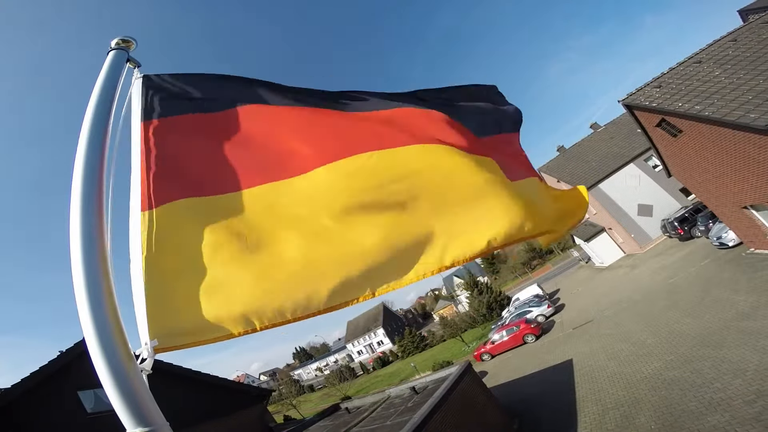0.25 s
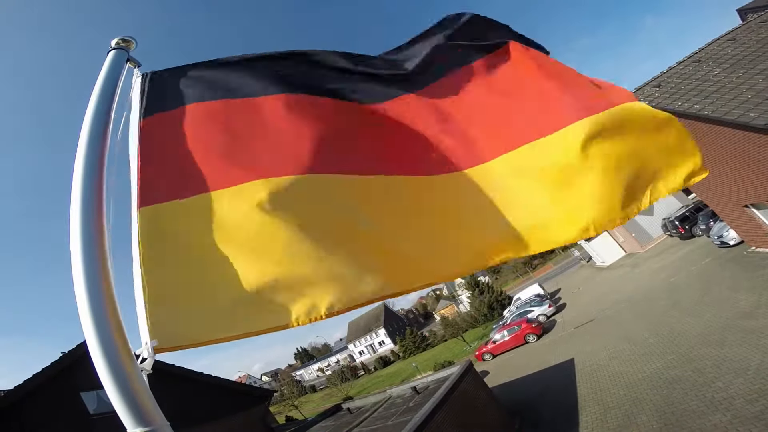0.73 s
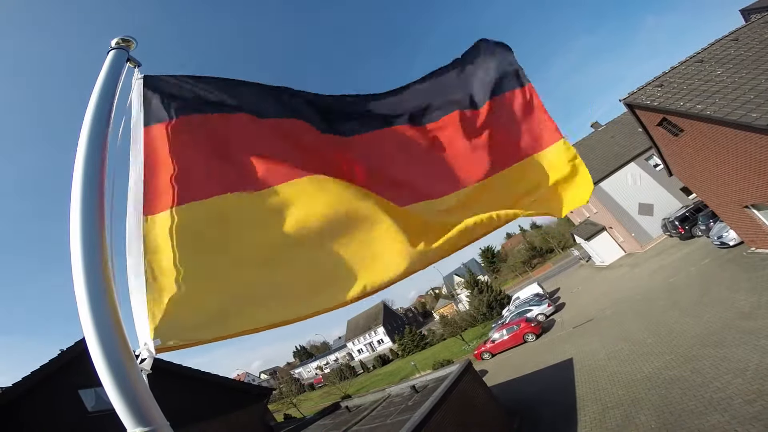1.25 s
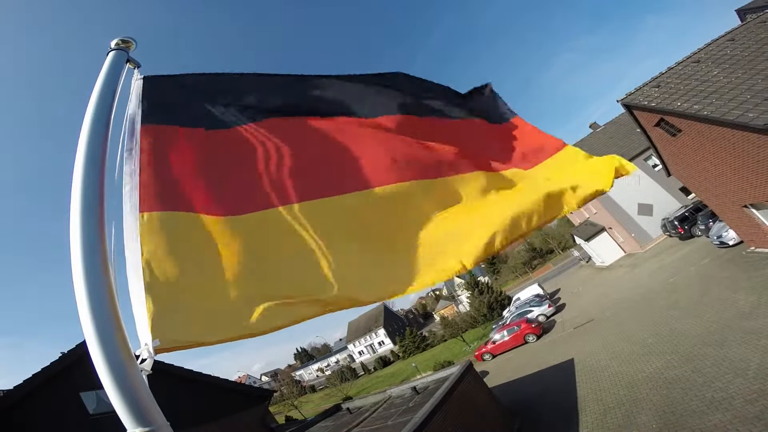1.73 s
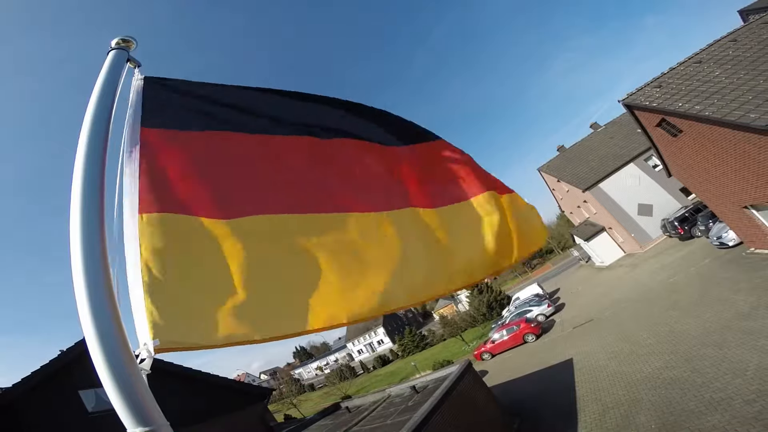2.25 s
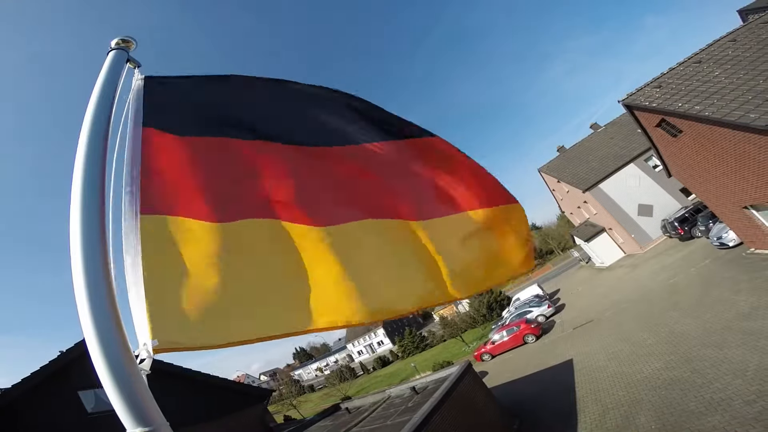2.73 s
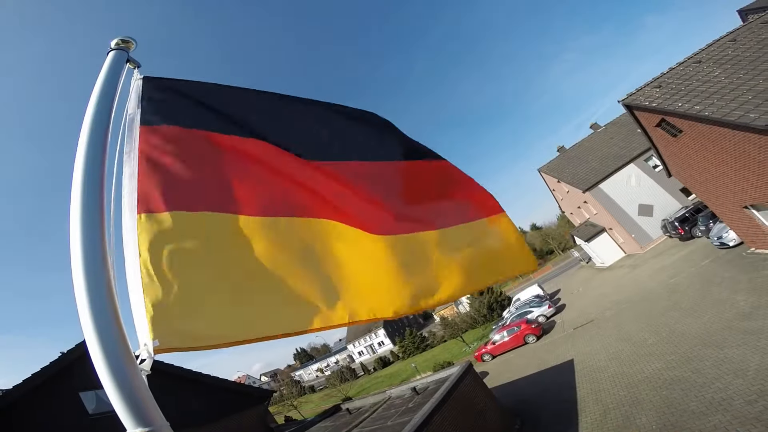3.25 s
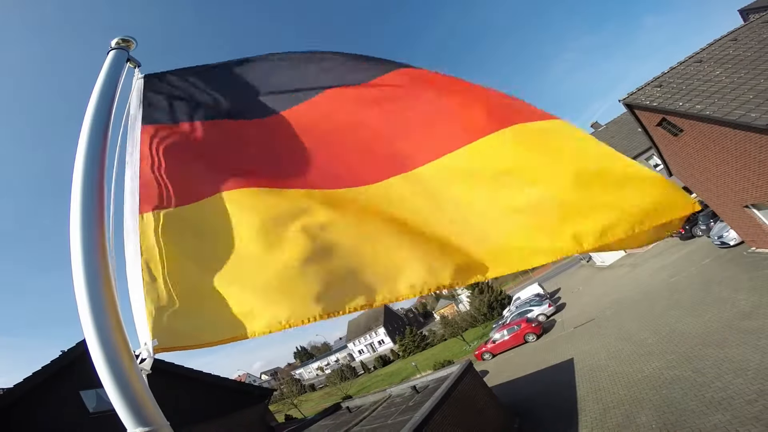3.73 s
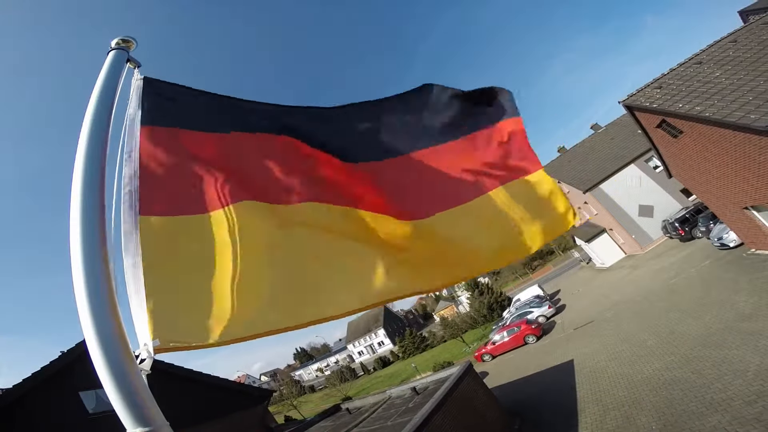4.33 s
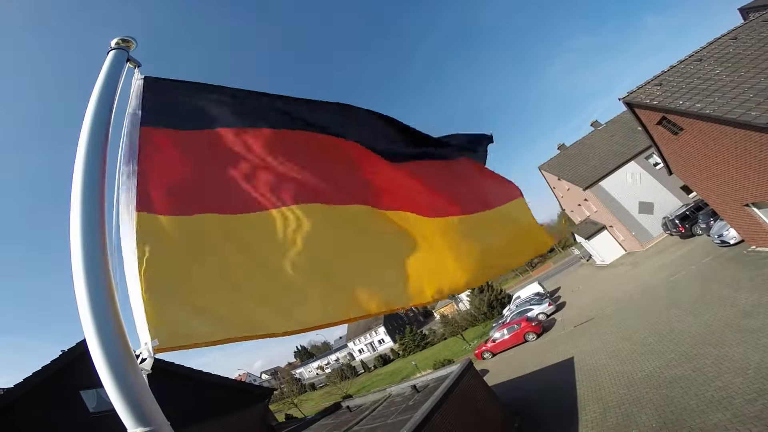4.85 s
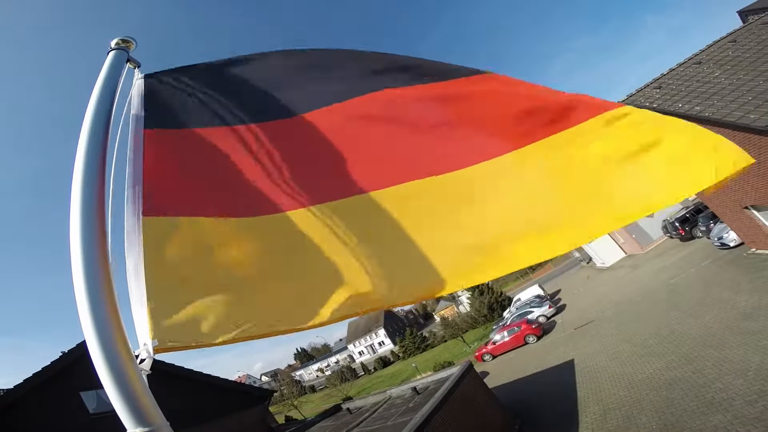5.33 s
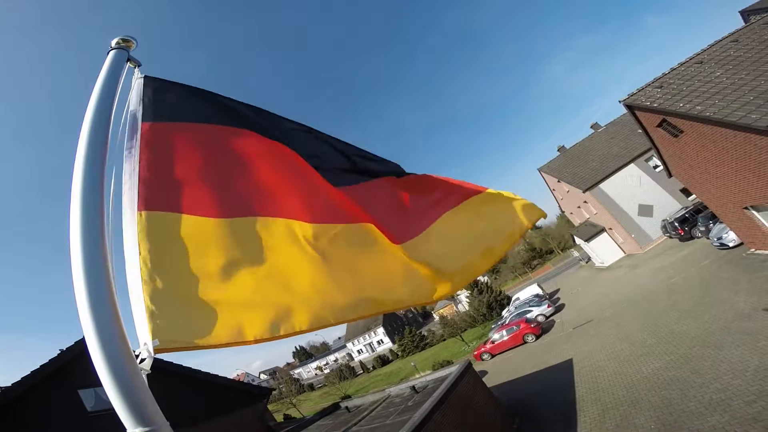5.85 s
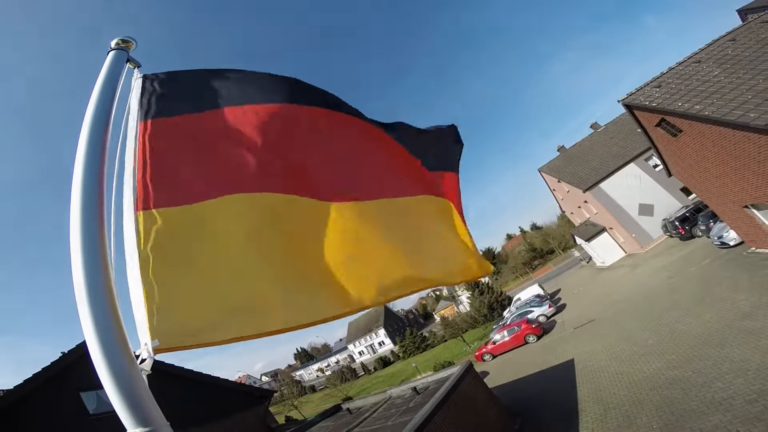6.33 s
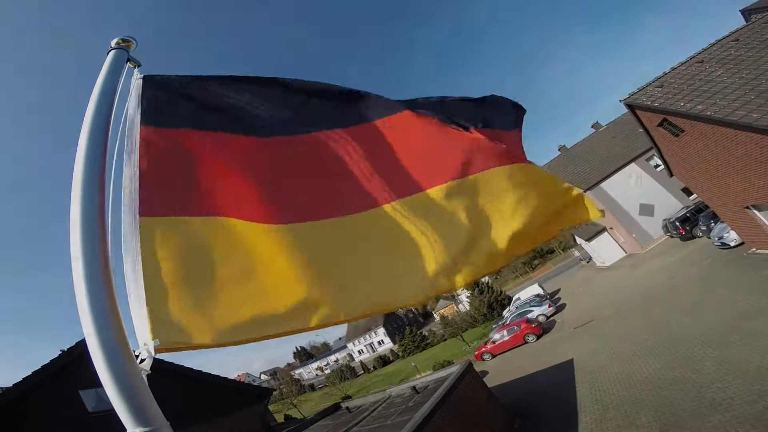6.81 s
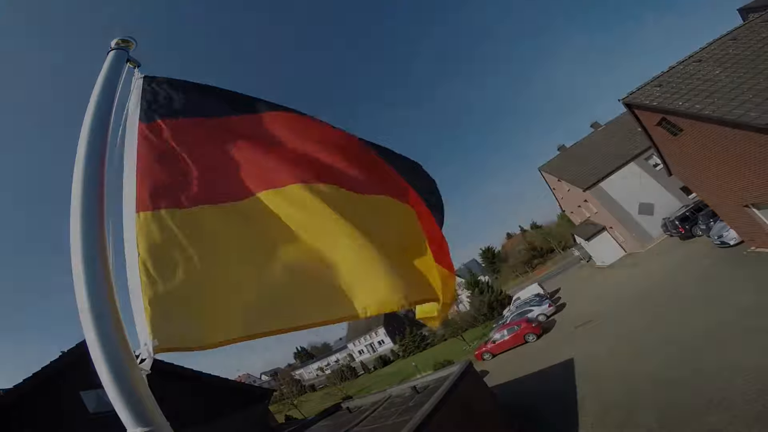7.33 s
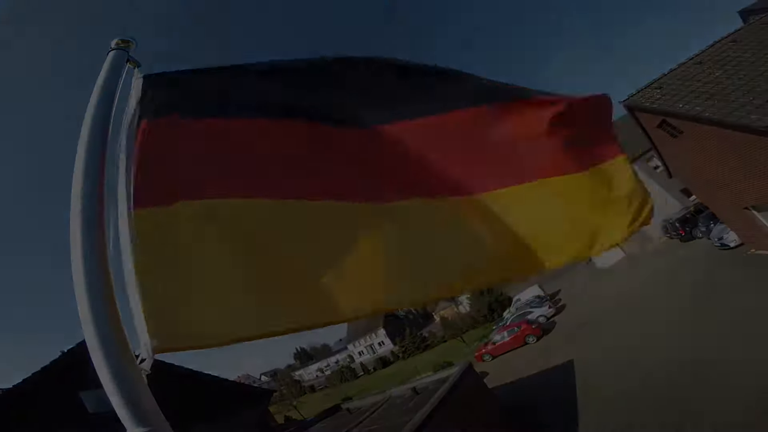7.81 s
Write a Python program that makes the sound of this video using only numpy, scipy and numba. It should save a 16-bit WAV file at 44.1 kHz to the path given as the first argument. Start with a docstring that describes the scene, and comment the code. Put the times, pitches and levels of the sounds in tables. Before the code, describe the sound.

Close-up of cloth flapping on a metal pole outdoors: deep uneven rumble, dry cracks and rustles, soft air hiss, a few late whumps.

```python
"""A cloth flag on a pole in a gusty wind, heard close up from a small camera's microphone fixed to the pole.
From the start the pole rumbles and booms under the tugging flag; cloth rustles, open air hisses, the camera whines.
Soon the cloth snaps, ripples and puffs, the snaps and ripples ringing in the pole; later come faint bright snaps,
a faint high twitter far off with one thin tick, and big folds that billow with a soft whump.
Throughout, the camera's gain control ducks under loud gusts, at first still recovering from an earlier one."""
import sys
import numpy as np
from scipy import signal
from scipy.fft import rfft, irfft
from scipy.io import wavfile
from scipy.ndimage import uniform_filter1d
from numba import njit

SR = 44100
rng = np.random.default_rng(int(sys.argv[2]) if len(sys.argv) > 2 else 0)


def file_out(sig):
    """Save sig as 16-bit WAV at sys.argv[1]."""
    # one column per channel
    cols = np.atleast_2d(sig).T
    # limit, then scale
    lim = np.clip(cols, -1, 1)
    pcm = np.round(lim * 32767).astype(np.int16)
    wavfile.write(sys.argv[1], SR, pcm)


N = 356151  # length [samples]

# All levels below stand ahead of the gain control.
# gusts on the flag: (time [s], steady pull on the pole [dB], drive of the cloth rustle [dB])
GUSTS = [(0, -39.5, -63), (0.55, -49.5, -61.5), (0.88, -44, -63.5), (1.1, -48.5, -62.5), (1.55, -42, -61),
         (1.75, -44, -65), (2.15, -47.5, -62.5), (2.55, -46, -66.5), (2.9, -50, -65), (3.15, -45.5, -66.5),
         (3.5, -46.5, -66.5), (4.35, -53, -68), (4.85, -50, -67.5), (5.5, -47.5, -65.5), (5.65, -51, -81),
         (6.0, -50, -68.5), (6.8, -48.5, -68), (7.3, -53.5, -72), (8.0, -47, -64)]
# how hard the pole sways: (time [s], level [dB])
SWAY_LEVELS = [(0, -39.5), (0.55, -44.5), (0.75, -38), (1.05, -44.5), (1.4, -42), (1.75, -49),
               (2.45, -42.5), (3.3, -48.5), (4.8, -46.5), (5.25, -42.5), (5.9, -46), (6.35, -39.5),
               (6.85, -48), (7.2, -47.5), (7.5, -53.5), (8.0, -46)]
# how strongly the pole hums: (time [s], level [dB])
HUM_LEVELS = [(0.1, -36.5), (0.3, -49.5), (0.7, -51.5), (1.1, -40.5), (1.45, -48.5), (1.7, -35),
              (2.05, -52.5), (2.45, -37.5), (2.9, -52.5), (3.1, -39), (3.5, -48.5), (4.1, -47.5),
              (4.35, -57.5), (4.9, -48.5), (5.7, -46.5), (5.9, -55), (6.2, -46), (6.5, -49.5),
              (6.75, -43.5), (7.25, -53.5), (8.0, -48)]
# bending modes of the pole, slow sway: (frequency [Hz], width [Hz], relative level [dB])
SWAY_MODES = [(24.55, 6.05, 2.5), (37.8, 1.3, -6.5), (38.8, 17, -21)]
# the pole's humming modes, between sway and drone: (frequency [Hz], width [Hz], relative level [dB])
HUM_MODES = [(74.84, 3.8, -7.5), (102.55, 7.1, -2.5)]
# the pole's faster bending modes: (frequency [Hz], width [Hz], relative level [dB])
DRONE_MODES = [(107, 3.4, -16), (134.25, 8.8, 5.5), (147.2, 4.2, 6.5), (161.34, 10.5, 1), (188.4, 21, -12),
               (250, 14, -25.5)]
# what the pole rings with when the cloth moves: (frequency [Hz], width [Hz], gain [dB])
POLE_RING = [(439.8, 10, 11.5), (508, 41, 4), (592, 36, 6), (736, 43, 8.5), (891, 49, 1.5),
             (1000, 94, -7.5), (1100, 32, -1), (1378, 120, 5.5), (1452, 35, 10.5), (1801, 24, 8),
             (1970, 120, -6.5), (2150, 79, 1), (2490, 160, -14.5), (2617, 41, -6.5), (2730, 30, -9),
             (2880, 60, -7.5), (3030, 120, -8)]
# spectrum of open air and microphone hiss: (frequency [Hz], relative level [dB])
AIR_SPECTRUM = [(200, 4), (300, 1), (600, -1.5), (1000, -5), (2000, -9), (3000, -13), (5000, -17.5),
                (8000, -23.5), (12000, -28.5), (15000, -34.5)]
# tones of the camera's electronics: (frequency [Hz], level [dB])
WHINE_TONES = [(6233, -81), (12461, -77.5)]
# hard tugs of the flag that set the pole booming: (time [s], level [dB])
HARD_TUGS = [(0.038, -31), (0.154, -34), (0.333, -40.5), (0.696, -39), (0.771, -34), (0.896, -42.5),
             (1.1, -35.5), (1.187, -32), (1.259, -34), (1.402, -36.5), (1.531, -42), (1.656, -33),
             (1.743, -35.5), (1.795, -46.5), (1.918, -40.5), (2.549, -36.5), (2.618, -40), (2.691, -41.5),
             (2.963, -48), (3.08, -32.5), (3.194, -36), (3.304, -37.5), (3.37, -39), (3.611, -41),
             (5.697, -36.5), (6.679, -37.5), (6.777, -46.5)]
# snaps of the cloth: (time [s], low body [dB], crack [dB], sharp edge [dB], edge centre [Hz], bright slap [dB])
CLOTH_SNAPS = [(0.298, -68, -54.5, -61, 2030, -69), (0.351, -66, -59, -65, 2020, -80),
               (0.401, -52.5, -49.5, -47.5, 2150, -58.5), (0.509, -58.5, -65, -59, 2130, -72),
               (0.657, -74, -57, -57, 2020, -61), (1.136, -58.5, -67, -63.5, 1890, -76),
               (1.382, -55, -51.5, -50.5, 1970, -63), (1.456, -65, -57.5, -59, 2030, -70),
               (1.616, -56, -69, -60, 2120, -72), (1.871, -60, -51, -54.5, 1840, -67),
               (1.906, -50.5, -55, -56.5, 1920, -78), (1.977, -60, -54.5, -68, 1970, -68),
               (2.02, -56.5, -56.5, -59, 1990, -70), (2.089, -51, -45.5, -48.5, 2010, -50),
               (2.194, -52.5, -51.5, -53, 1990, -62), (2.322, -60, -55.5, -58, 1810, -70),
               (2.388, -54, -45, -50.5, 2100, -64), (2.44, -58, -46.5, -47.5, 1820, -55.5),
               (2.5, -54, -49, -57, 2150, -72), (2.918, -60, -53, -51.5, 1970, -64),
               (3.039, -59, -51.5, -47.5, 1980, -59), (3.27, -53, -48.5, -49, 1850, -56.5),
               (4.748, -63.5, -51.5, -59, 2010, -62.5), (5.246, -51, -42.5, -45.5, 1770, -57.5),
               (5.414, -75, -66.5, -59.5, 2150, -68.5), (5.575, -58.5, -63, -66, 1920, -83),
               (6.048, -58, -55.5, -57.5, 2040, -59.5), (7.011, -61, -56, -59.5, 1820, -70),
               (7.214, -67, -65.5, -57.5, 2200, -70), (7.235, -58.5, -62, -61, 2000, -62),
               (7.254, -65, -57, -55.5, 2000, -60.5), (8.039, -65, -56, -56.5, 2040, -76)]
# stretch in which snaps also knock a low note out of the pole: (from [s], to [s])
KNOCK_STRETCH = (1.85, 3.33)
# ripples running down the cloth, each a brief swell of its rustle: (time [s], level [dB])
CLOTH_RIPPLES = [(0.558, -65), (0.81, -61.5), (1.17, -63), (2.275, -61), (2.69, -61), (3.16, -58.5),
                 (3.232, -72), (3.977, -66), (4.109, -62), (4.233, -65.5), (4.845, -61), (4.9, -63),
                 (5.003, -65), (5.347, -61.5), (5.533, -60.5), (6.658, -60.5), (6.748, -66), (7.071, -63),
                 (7.738, -66.5), (7.96, -64)]
# soft flaps of slack folds, and the hollow ring of an air pocket in two hard snaps:
# (time [s], pop [dB], pop centre [Hz], hollow tail [dB], tail centre [Hz])
CLOTH_PUFFS = [(0.597, -63, 1500, -59, 593), (0.681, -60.5, 1100, -60, 758), (0.735, -63, 1000, -60, 687),
               (0.773, -61, 810, -59, 684), (0.925, -61.5, 1220, -60, 803), (1.045, -69, 950, -61, 777),
               (1.356, -64, 1310, -63, 927), (1.555, -59, 1250, -65, 967), (1.676, -55, 1050, -55, 958),
               (2.388, -50, 1100, -54, 1073), (2.503, -49, 1020, -47.5, 1057), (3.379, -55, 1450, -63, 650),
               (3.568, -63, 1240, -62, 651), (4.556, -57.5, 1530, -62, 944), (6.184, -55, 1440, -64, 593),
               (6.208, -60, 1340, -63, 803), (6.229, -59, 1250, -65, 707), (6.951, -58, 1480, -69, 640)]
# the light bright tick of a faint snap, mostly along with a soft rustle: (time [s], level [dB])
FAINT_SNAPS = [(2.685, -73), (3.157, -73), (4.487, -68), (4.716, -65), (5.343, -68)]
# chirps of the far-off twitter: (time [s])
CHIRP_TIMES = [3.387, 3.407, 3.462, 3.505, 3.548, 3.588, 3.627]
# big folds that billow: (time [s], whump peak [dB], rush of air before its swell is shaped [dB])
BIG_BILLOWS = [(5.596, -28, -59), (6.238, -41, -56), (6.652, -42, -62), (8.045, -28, -48.5)]


def undb(db):
    """Decibels to gain."""
    return 10 ** (np.asarray(db) / 20)


def level(x, db):
    """Scale to an rms level."""
    return x * undb(db) / np.sqrt(np.mean(x ** 2))


def burst(x, db, length_s):
    """Give a short sound the energy of level db held for length_s."""
    return x * undb(db) * np.sqrt(length_s * SR / np.sum(x ** 2))


def band(x, hz, width):
    """One resonance, gain 1 at its centre."""
    return signal.lfilter(*signal.iirpeak(hz, hz / width, fs=SR), x)


def steep(x, hz, width):
    """A resonance applied twice, for steep skirts."""
    return band(band(x, hz, width), hz, width)


def cut(x, hz, kind, order=2):
    """Low-pass or high-pass."""
    return signal.sosfilt(signal.butter(order, hz, kind, fs=SR, output="sos"), x)


def add(out, s, x):
    """Mix a short sound in at time s."""
    i = int(np.clip(s * SR, 0, N - 1))
    out[i:i + len(x)] += x[:N - i]


def curves(table):
    """The columns of a table, joined by straight lines in time."""
    s, *columns = np.transpose(table)
    return [np.interp(np.arange(N) / SR, s, c) for c in columns]


def walk(rate):
    """Smooth chance with a spread near 1, drawn afresh rate times a second."""
    k = int(SR / rate)
    steps = np.repeat(rng.standard_normal(N // k + 1), k)
    return 0.89 * uniform_filter1d(uniform_filter1d(steps, k), k)[:N]


def pole(x, direct_db=-14, cloth_hz=3100, low_hz=400):
    """Soft cloth makes little treble; its noise arrives straight through the air and through the ringing pole."""
    x = cut(x, cloth_hz, "low", order=8)
    ring = sum(undb(db) * band(x, hz, width) for hz, width, db in POLE_RING)
    direct = undb(direct_db) * cut(x, low_hz, "high")
    return direct + cut(ring, 305, "high", order=5)


def swish(hz, end_hz, t, fall_s=0.0043, width_hz=210, rise_s=0.0059):
    """The eddy shed by a flap slows down, so its rush of air glides from hz to end_hz."""
    centre = end_hz + (hz - end_hz) * np.exp(-t / fall_s)
    eddy = cut(rng.standard_normal(len(t)), width_hz, "low") * np.cos(2 * np.pi * np.cumsum(centre) / SR)
    return eddy * t / rise_s * np.exp(-t / rise_s)


def whip(t, db, gather_s=0.0012, crumple_s=0.0049, crumple_db=-1, soften=0.58, hard_db=-43,
         echo_s=0.012, echo_db=-11, settle_s=0.018, settle_db=-15, creases=5, crease_size=0.3):
    """Cloth gathers speed, jerks taut at t = 0 crease by crease and settles raggedly; weak flaps mostly crumple."""
    crumple = rng.standard_normal(len(t)) * np.exp(-np.maximum(t / crumple_s, -t / gather_s))
    crackle = rng.laplace(size=len(t)) * (t > 0) * np.exp(-np.abs(t) / settle_s)
    crumple += undb(settle_db) * crackle
    push = undb(crumple_db + soften * (hard_db - db)) * crumple / np.linalg.norm(crumple)
    push[np.searchsorted(t, 0)] += 1
    crease_at = np.searchsorted(t, echo_s * rng.random(creases))
    push[crease_at] += crease_size * rng.standard_normal(creases)
    # a nearby surface throws the jerk back
    push[np.searchsorted(t, echo_s)] += undb(echo_db)
    return push


def shaken(modes, hold_s):
    """Modes driven by turbulence, evened out to unit strength over about hold_s."""
    push = rng.standard_normal((len(modes), N + SR))  # the extra second lets the modes build up
    x = 0
    for p, (hz, width, db) in zip(push, modes):
        mode = level(band(band(p, hz, width), hz, 3 * width), 0)
        x = x + undb(db) * np.sqrt(width) * mode
    size = int(hold_s * SR)
    power = uniform_filter1d(uniform_filter1d(x ** 2, size), size)
    return (x / np.sqrt(power))[SR:]


def sway(mean_db, ripple_db=4.0, ripple_hz=6.7, wander=0.1697):
    """The pole's sway in dB: it swells with each wave that runs down the cloth, several times a second."""
    waves = np.cumsum(ripple_hz * np.exp(wander * walk(2.68))) / SR
    return mean_db + ripple_db * np.sin(2 * np.pi * waves)


def pull(steady_db, flutter_db=4.0, flutter_rate=22, lag_s=0.039, jerk_s=0.015,
         jerk_db=-48, jerk_swell=0.77, usual_db=-55):
    """The flag's pull in dB: a fluttering steady load and a small jerk just after each snap."""
    t = np.arange(N) / SR
    power = undb(steady_db + flutter_db * walk(flutter_rate)) ** 2
    for s, _, db, *_ in CLOTH_SNAPS:
        near = slice(*np.searchsorted(t, [s - 10 * jerk_s, s + 10 * jerk_s]))
        jerk = undb(jerk_db + jerk_swell * (db - usual_db)) ** 2
        power[near] += jerk * np.exp(-((t[near] - s - lag_s) / jerk_s) ** 2)
    return 10 * np.log10(power)


def rumble(sway_db, hum_db, pull_db, sway_gain_db=-0.33, hum_gain_db=-1.4, drone_gain_db=-0.5):
    """The flag shakes the pole: a slow sway, a hum, and a drone that follows the pull."""
    swing = shaken(SWAY_MODES, hold_s=0.077) * undb(sway_db + sway_gain_db)
    hum = shaken(HUM_MODES, hold_s=0.083) * undb(hum_db + hum_gain_db)
    drone = shaken(DRONE_MODES, hold_s=0.092) * undb(pull_db + drone_gain_db)
    return swing + hum + drone


def rustle(rustle_db, rate=320, scatter_db=3.5, flutter_db=2.5, gain_db=-2, swell=2.64, mid_db=-63, soft_hz=1900):
    """Small creases pat over in ripples along the cloth, far stronger when the wind pulls hard."""
    sizes = undb(scatter_db * np.minimum(rng.exponential(size=N), 3))
    pats = (rng.random(N) < rate / SR) * rng.choice([-1, 1], N) * sizes
    cloth = pole(cut(pats, soft_hz, "low", order=4) * undb(flutter_db * walk(30)))
    # the drive's distance from mid_db is widened by swell
    return level(cloth, gain_db) * undb(mid_db + swell * (rustle_db - mid_db))


def air(air_db=-63, waver_db=-2.0, near_hz=1500):
    """Wind over the yard wavers in the middle range and below; the hiss above stays smooth."""
    hz, db = np.transpose(AIR_SPECTRUM)
    f = np.maximum(np.arange(N // 2 + 1) * SR / N, 1)
    shape = undb(np.interp(np.log(f), np.log(hz), db))
    x = irfft(rfft(rng.standard_normal(N)) * shape, N)
    waver = cut(x, near_hz, "low", order=1) * (undb(waver_db * walk(10)) - 1)
    return level(x + waver, air_db)


def whine(clock_hz=25):
    """Thin electronic tones that start afresh on each cycle of the camera's clock and pause for its last quarter."""
    cycle = (np.arange(N) / SR * clock_hz - .19) % 1
    on = cycle < .75
    tones = sum(np.sqrt(2) * undb(db) * np.sin(2 * np.pi * hz * cycle / clock_hz) for hz, db in WHINE_TONES)
    return on * tones


def tugs(boom_hz=149, spread_hz=5, rise_s=0.015, fall_s=0.017):
    """Each hard tug swells into a short boom among the pole's drone modes."""
    out, t = np.zeros(N), np.arange(-SR // 12, SR // 8) / SR
    swell = np.exp(-(t / np.where(t < 0, rise_s, fall_s)) ** 2 / 2)
    for s, db in HARD_TUGS:
        hz = boom_hz + spread_hz * rng.standard_normal()
        boom = np.sqrt(2) * undb(db) * swell * np.sin(2 * np.pi * (hz * t + rng.random()))
        add(out, s + t[0], boom[s + t >= 0])
    return out


def knock(t, hz=436, decay_s=0.033, rise_s=0.0052):
    """A snap jolts the pole, which rings on with one low note."""
    return np.sin(2 * np.pi * hz * t) * np.exp(-t / decay_s) * (1 - np.exp(-t / rise_s))


def snaps(crack_hz=1120, crack_hz_per_db=6, crack_width_hz=600, edge_width_hz=500,
          slap_hz=2950, slap_width_hz=650, crisp_hz=4620, crisp_width_hz=450, crisp_db=-18,
          crack_s=0.021, slap_s=0.016, usual_db=-55, body_from_hz=900, body_to_hz=540, body_spread=0.091,
          knock_db=-66, knock_swell=0.72):
    """The free edge whips round: a sharp-edged crack, a brighter slap of cloth on cloth, a low swish, some knocks."""
    out, t = np.zeros(N), np.arange(-SR // 80, SR // 6) / SR
    after = np.maximum(t, 0)
    for s, body_db, db, edge_db, edge_hz, slap_db in CLOTH_SNAPS:
        # a crack is higher the more it stands above its low body
        hz = crack_hz + crack_hz_per_db * (db - body_db)
        push = whip(t, max(db, edge_db))
        crack = burst(pole(steep(push, hz, crack_width_hz)), db, crack_s)
        edge = burst(pole(steep(push, edge_hz, edge_width_hz)), edge_db, crack_s)
        slap = burst(pole(steep(push, slap_hz, slap_width_hz)), slap_db, slap_s)
        # the crispest part comes straight through the air, not through the pole
        crisp = burst(steep(push, crisp_hz, crisp_width_hz), slap_db + crisp_db, slap_s)
        end_hz = body_to_hz * np.exp(body_spread * rng.standard_normal())
        body = burst(pole(swish(body_from_hz, end_hz, after)), body_db, crack_s)
        add(out, s + t[0], crack + edge + slap + crisp + body)
        if KNOCK_STRETCH[0] < s < KNOCK_STRETCH[1]:
            add(out, s + t[0], burst(knock(after), knock_db + knock_swell * (db - usual_db), crack_s))
    return out


def ripples(ripple_s=0.0079, rate=1200, soft_hz=2300, direct_db=-5):
    """A ripple sets off a quick cluster of tiny pats that swells and fades."""
    out, t = np.zeros(N), np.arange(-SR // 20, SR // 10) / SR
    for s, db in CLOTH_RIPPLES:
        pats = (rng.random(len(t)) < rate / SR) * rng.standard_normal(len(t)) * np.exp(-np.abs(t) / ripple_s)
        cluster = pole(cut(pats, soft_hz, "low"), direct_db)
        add(out, s + t[0], burst(cluster, db, 2 * ripple_s))
    return out


def puffs(pop_s=0.002, pop_width=0.85, echo_s=0.008, echo_db=-9, crackle_hz=2800, crackle_width_hz=900,
          crackle_db=-15.0, tail_width_hz=110, tail_rise_s=0.0067, puff_s=0.018):
    """A slack fold flaps, or a hard snap traps air: a dull pop, a little crackle, and the air pocket's hollow ring."""
    out, t = np.zeros(N), np.arange(-SR // 80, SR // 10) / SR
    after = np.maximum(t, 0)
    for s, pop_db, pop_hz, tail_db, tail_hz in CLOTH_PUFFS:
        crumple = rng.standard_normal(len(t)) * np.exp(-np.abs(t) / pop_s)
        push = (t == 0) + .5 * crumple / np.linalg.norm(crumple)
        push = push + undb(echo_db) * np.roll(push, int(echo_s * SR))
        # pop_width is a share of the pop's centre
        dull = cut(steep(push, pop_hz, pop_width * pop_hz), 1.22 * pop_hz, "low", order=4)
        pop = burst(dull, pop_db, puff_s)
        crisp = pole(steep(whip(t, pop_db), crackle_hz, crackle_width_hz))
        crackle = burst(crisp, pop_db + crackle_db, puff_s)
        # the hollow tail holds its pitch
        hollow = swish(tail_hz, tail_hz, after, width_hz=tail_width_hz, rise_s=tail_rise_s)
        tail = burst(hollow, tail_db, puff_s)
        add(out, s + t[0], pop + crackle + tail)
    return out


def faint_snaps(hz=2950, width_hz=900, snap_s=0.014):
    """The light bright tick of a faint snap, mostly along with a soft rustle: a weak whip through a high band."""
    out, t = np.zeros(N), np.arange(-SR // 80, SR // 10) / SR
    for s, db in FAINT_SNAPS:
        add(out, s + t[0], burst(pole(steep(whip(t, db), hz, width_hz)), db, snap_s))
    return out


def twitter(chirp_hz=9900, sink_hz_per_s=40000, chirp_s=0.0056, chirp_db=-80,
            tick_at_s=3.998, tick_hz=6500, tick_width_hz=4000, tick_s=0.0034, tick_db=-69):
    """Tiny falling chirps far off, high above the wind, and a thin tick."""
    out, t = np.zeros(N), np.arange(-SR // 60, SR // 60) / SR
    for s in CHIRP_TIMES:
        hz = chirp_hz * (1 + 0.014 * rng.standard_normal()) - sink_hz_per_s * t
        chirp = np.sin(2 * np.pi * np.cumsum(hz) / SR) * np.exp(-(t / chirp_s) ** 2)
        add(out, s + t[0], undb(chirp_db) * chirp)
    tick = steep(1.0 * (t == 0), tick_hz, tick_width_hz)
    add(out, tick_at_s + t[0], burst(tick, tick_db, tick_s))
    return out


def billows(whump_hz=154, start_hz=70, fall_s=0.0047, rise_s=0.022, rush_hz=470, rush_width_hz=420, rush_s=0.016):
    """A big fold fills: air rushes out, then a whump sinks in pitch into the pole's drone."""
    out, t = np.zeros(N), np.arange(SR // 3) / SR
    for s, whump_db, rush_db in BIG_BILLOWS:
        hz = whump_hz + start_hz * np.exp(-t / fall_s)
        swell = (t / rise_s * np.exp(1 - t / rise_s)) ** 2
        whump = np.sin(2 * np.pi * np.cumsum(hz) / SR) * swell
        rush = level(steep(rng.standard_normal(len(t)), rush_hz, rush_width_hz), rush_db)
        add(out, s, undb(whump_db) * whump)
        # the rush peaks as the whump begins
        add(out, s - 2 * rush_s, rush * np.exp(-(t / rush_s - 2) ** 2))
    return out


def scene(buffet_db=2.2, buffet_rate=16):
    """Rumbling pole, cloth and open air at one microphone."""
    steady_db, rustle_db = curves(GUSTS)
    sway_db, = curves(SWAY_LEVELS)
    hum_db, = curves(HUM_LEVELS)
    # eddies swell the pole's hum and drone together
    buffet = buffet_db * walk(buffet_rate)
    shaking = rumble(sway(sway_db), hum_db + buffet, pull(steady_db) + buffet)
    steady = shaking + rustle(rustle_db) + air() + whine()
    events = tugs() + snaps() + ripples() + puffs() + faint_snaps() + twitter() + billows()
    return (steady + events)[None]


@njit
def follow(x, attack, release, start):
    """Envelope that rises fast and sinks slowly."""
    out, e = np.empty(len(x)), start
    for i in range(len(x)):
        e += (abs(x[i]) - e) * (attack if abs(x[i]) > e else release)
        out[i] = e
    return out


def record(dry, limit_db=-33, ratio=5, attack_s=0.0032, release_s=0.21, start_db=-23, top_hz=15000):
    """Gain control, still recovering from an earlier gust, turns everything down under loud ones; the top is cut."""
    envelope = follow(dry[0], 1 / (attack_s * SR), 1 / (release_s * SR), float(undb(start_db)))
    gain = np.maximum(envelope / undb(limit_db), 1) ** (1 / ratio - 1)
    top_cut = signal.ellip(10, .2, 70, top_hz, fs=SR, output="sos")
    return signal.sosfilt(top_cut, dry * gain)


dry = scene()
out = record(dry)
file_out(out)
```